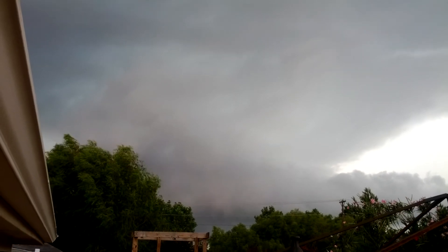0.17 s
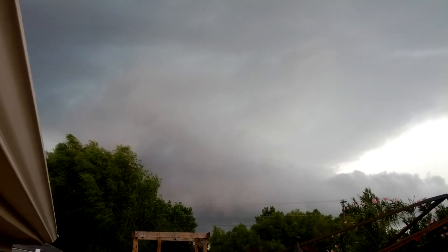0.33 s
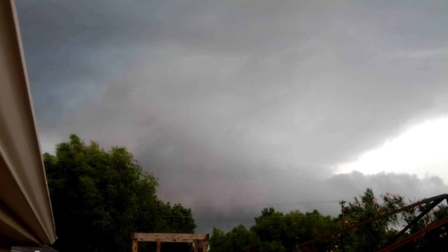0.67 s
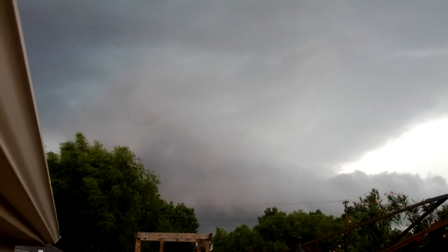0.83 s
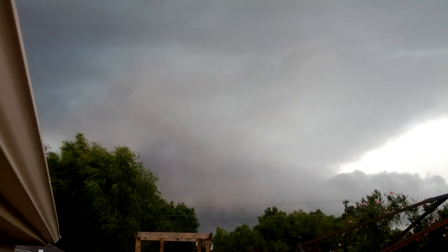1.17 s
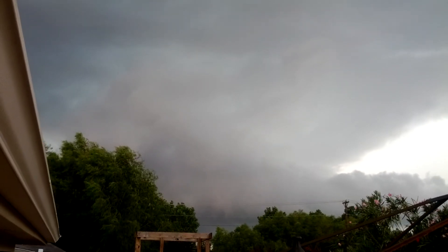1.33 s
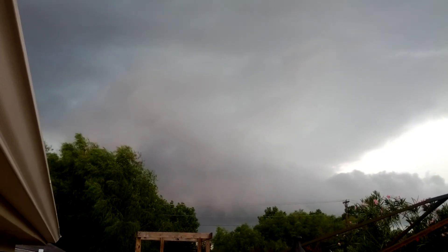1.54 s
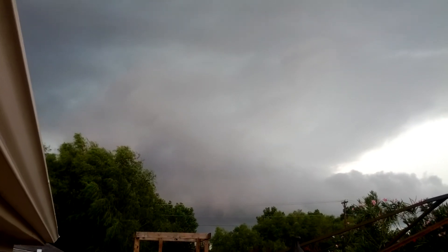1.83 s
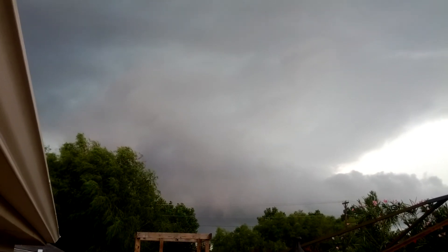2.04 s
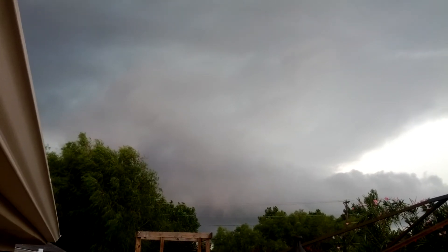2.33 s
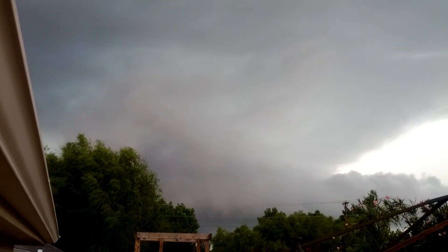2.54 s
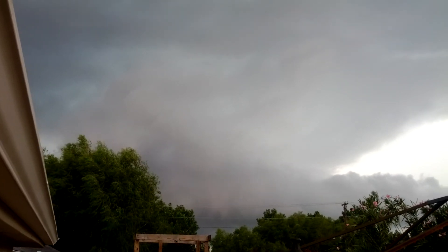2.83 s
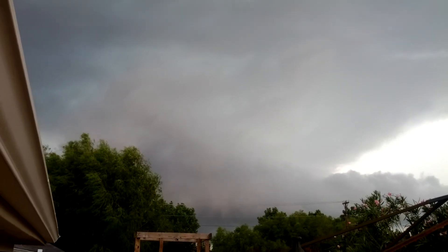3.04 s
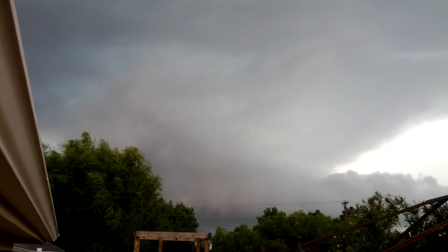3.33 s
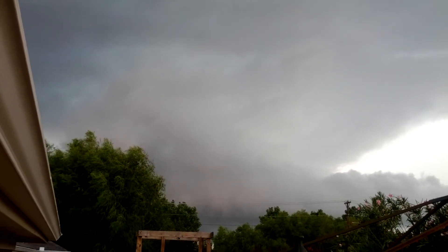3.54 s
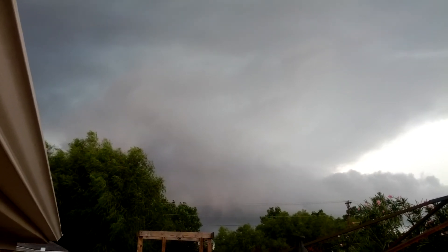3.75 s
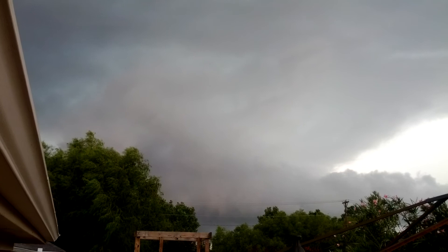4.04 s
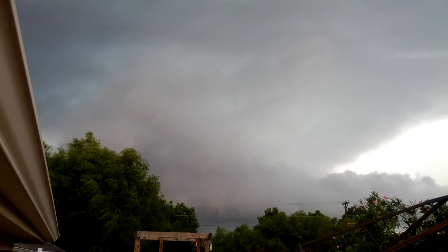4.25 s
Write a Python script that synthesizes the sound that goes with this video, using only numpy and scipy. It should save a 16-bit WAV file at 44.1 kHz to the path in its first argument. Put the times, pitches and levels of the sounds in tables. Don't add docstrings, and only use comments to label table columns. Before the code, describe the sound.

Low thunder mutters behind rain and small metal clinks, swells to a deep distorted roar midway, then rolls away, leaving rain hiss.

```python
import sys
import numpy as np
from scipy import signal
from scipy.fft import rfft, irfft, next_fast_len
from scipy.io import wavfile
from scipy.ndimage import uniform_filter1d, map_coordinates

SR = 44100
rng = np.random.default_rng(int(sys.argv[2]) if len(sys.argv) > 2 else 0)


def to_wav(sig):
    pcm = np.clip(np.atleast_2d(sig), -1, 1) * 32767
    pcm = np.round(pcm).astype(np.int16)
    wavfile.write(sys.argv[1], SR, pcm.T)


def how_loud(loudness_db):
    steps = np.asarray(loudness_db, float) / 20
    return 10 ** steps


N = 193907

# time in s, peak level in dB, pitch in Hz.
GRUMBLES = [(0.193, -29, 252), (.294, -15.5, 219), (.507, -19, 213), (0.544, -25, 255), (.653, -25, 363),
            (0.686, -45, 198), (.855, -18, 276), (0.859, -23, 106), (.978, -30, 225), (1.146, -28, 440),
            (1.273, -22.5, 248), (1.298, -23, 252), (1.402, -21.5, 423), (1.454, -21, 248),
            (1.488, -13, 347), (1.515, -13.5, 343), (1.563, -19, 324), (1.591, -17.5, 176),
            (1.62, -17.5, 320), (1.68, -18.5, 350), (1.761, -17, 225), (1.763, -21, 89), (1.786, -19, 280),
            (1.834, -24, 447), (1.891, -27, 398), (1.935, -30, 401), (2.003, -24, 436), (2.063, -22, 445),
            (2.106, -20.5, 386), (2.183, -12, 225)]
# time in s, peak level in dB, pitch in Hz.
BOOMS = [(2.194, -20, 377), (2.273, -12, 353), (2.331, -5, 360), (2.381, -8.5, 314), (2.412, 1.5, 244),
         (2.445, -3, 250), (2.504, -18, 240), (2.565, 2.5, 230), (2.619, 0, 241), (2.651, 3.5, 71),
         (2.708, 8, 187), (2.764, -1, 230), (2.831, -23, 246), (2.879, -1, 160), (2.913, 3.5, 208),
         (2.998, -1, 178), (3.101, -6.5, 174), (3.174, 5, 194), (3.229, -3, 200), (3.286, -1.5, 146),
         (3.359, -12.5, 203), (3.456, -4, 145), (3.491, -15.5, 342), (3.506, -12, 128), (3.633, -15, 127),
         (3.58, -23, 145), (3.737, -19, 143), (3.76, -27, 140), (3.909, -31, 125), (4.237, -22.5, 125)]
# time in s, peak level in dB, pitch in Hz.
HEAVES = [(0.039, -27, 74), (0.301, -31, 67.4), (0.509, -23, 75), (1.181, -25, 60), (1.618, -26, 95),
          (1.711, -28, 60), (2.27, -21, 59.4), (2.368, -15, 86), (2.425, -2.5, 49), (2.481, -8, 66.5),
          (2.52, -8, 48.3), (2.565, 2.5, 59), (2.603, 0.5, 88), (2.773, -2.5, 85), (2.928, -1.5, 66),
          (2.976, -2, 63.6), (3.035, -9, 61), (3.095, -32, 73), (3.171, -5, 52), (3.231, -7.5, 49.7),
          (3.298, -14, 54), (3.639, -22, 60), (3.79, -27, 76)]


def unit(x):
    return x / np.sqrt(np.mean(x ** 2) + 1e-20)


def curves(rows):
    s, *cols = np.transpose(rows)
    return [np.interp(np.arange(N) / SR, s, c) for c in cols]


def coloured(x, points):
    m = next_fast_len(N + 8192)
    f, v = np.transpose(points)
    log_hz = np.log(np.fft.rfftfreq(m, 1 / SR) + 1)
    gain = how_loud(np.interp(log_hz, np.log(f), v, left=-120, right=-120))
    return unit(irfft(rfft(x, m) * gain, m)[:N])


def patchy(depth_db, bins, frames):
    z = signal.stft(rng.standard_normal(N + 512), nperseg=512)[2]
    field = uniform_filter1d(rng.standard_normal(z.shape), bins, 0)
    field = uniform_filter1d(field, frames, 1)
    return signal.istft(z * how_loud(depth_db * unit(field)), nperseg=512)[1][:N]


def impulses(rate, spread_db):
    hit = rng.random(N) < rate / SR
    size = how_loud(spread_db * np.minimum(rng.exponential(1, N), 3.5))
    return unit(hit * rng.standard_normal(N) * size)


def wobble(rate):
    knots = rng.standard_normal(int(N * rate / SR) + 4)
    return map_coordinates(knots, [np.arange(N) * rate / SR])


def add(track, s, sound):
    part = track[max(round(s * SR), 0):][:len(sound)]
    part += sound[:len(part)]


def drone():
    # frequency in Hz, density in dB per Hz.
    drone_spectrum = [(15, -33), (25, 6.5), (112, -3.5), (240, -6.5), (592, -14), (1060, -8), (1350, -15),
                      (1750, -16), (3000, -26.5), (3900, -78), (6600, -120)]
    return how_loud(-41.5) * coloured(patchy(1.44, bins=3, frames=10), drone_spectrum)


def rain():
    # frequency in Hz, density in dB per Hz.
    rain_spectrum = [(1500, -7), (2000, -13), (2600, -19.5), (3250, -14.5), (3450, -9.5), (4100, -7.5),
                     (4800, -1.5), (5600, -1.5), (6500, -2.5), (7300, -8.5), (7700, -11.5), (10300, -17),
                     (12000, -23), (15700, -28)]
    start_db, easing_db_per_s = -40, 0.29
    level_db = start_db - easing_db_per_s * np.arange(N) / SR + .3 * wobble(3)
    drops = patchy(1.0, bins=5, frames=12) + 0.27 * impulses(rate=3000, spread_db=3.5)
    return how_loud(level_db) * coloured(drops, rain_spectrum)


def heavy_drops():
    # time in s, peak level in dB, pitch in Hz.
    drop_hits = [
        (0.379, -21, 5190),
        (1.4294, -35, 5770),
        (2.357, -19, 4870),
        (3.0194, -24, 5170),
        (3.5463, -31, 5600),
    ]
    out = np.zeros(N)
    t = np.arange(400) / SR
    for s, db, hz in drop_hits:
        add(out, s, how_loud(db - 7.5 - 60 * t / .006) * np.sin(2 * np.pi * hz * t))
    return out


def gusts():
    # time of the peak in s, peak level in dB, length in s.
    gust_swells = [(0.097, -51.5, 0.062), (0.26, -55, 0.059), (0.364, -53, 0.042), (0.46, -63, 0.027),
                   (0.559, -58, 0.051), (0.807, -54, 0.081), (0.937, -57, 0.057), (1.08, -52.1, 0.088),
                   (1.326, -52.4, 0.076), (1.51, -52, 0.034), (1.6, -54.0, 0.072), (1.753, -52.4, 0.078),
                   (1.864, -51, 0.076), (2.027, -53.1, 0.11), (2.24, -53, 0.088), (2.398, -54.4, 0.071),
                   (2.491, -54, 0.08), (2.63, -54, 0.12), (2.75, -55, 0.081), (2.91, -50.5, 0.061),
                   (3.04, -50, 0.081), (3.228, -53, 0.19), (3.43, -52.5, 0.062), (3.555, -51.5, 0.074),
                   (3.787, -57, 0.1), (3.976, -58, 0.091), (4.193, -72, 0.048), (4.337, -58, 0.047)]
    lull_db, rise_over_fall = -58.5, 0.68
    t = np.arange(N) / SR
    swell = how_loud(lull_db)
    for s, db, length in gust_swells:
        side = np.where(t < s, .6 * rise_over_fall, .6)
        swell = swell + how_loud(db) * np.exp(-((t - s) / length / side) ** 2)
    return swell


def swish():
    # frequency in Hz, density in dB per Hz.
    swish_spectrum = [(4410, -58), (7500, 1), (8930, 2.5), (10600, 2.5), (12100, -3), (12500, -1),
                      (14400, -8), (15600, -6)]
    flutter = patchy(1.5, bins=8, frames=6) + .4 * impulses(rate=3000, spread_db=1.2)
    return how_loud(3.0) * gusts() * coloured(flutter, swish_spectrum)


def insect():
    # time in s, level in dB.
    insect_level = [
        (0, -66),
        (.3, -63),
        (2.5, -63),
        (3.5, -63),
        (3.8, -61.5),
        (4.4, -60.5),
    ]
    stroke_rate, first_stroke = 58.16, .0139
    starts = np.arange(first_stroke, N / SR, 1 / stroke_rate)
    starts += .00002 * np.abs(np.cumsum(rng.standard_normal(len(starts))))
    sizes = how_loud(1.2 * rng.standard_normal(len(starts)))
    strokes = np.bincount((starts * SR).astype(int), sizes, N)[:N]
    t = np.arange(700) / SR
    onset = 1 - np.exp(-t / 0.00061)
    shape = onset * (how_loud(-60 * t / .012) + 0.13 * how_loud(-60 * t / 0.027))
    ring = signal.fftconvolve(strokes, shape * np.sin(2 * np.pi * 12790 * t))[:N]
    return how_loud(curves(insect_level)[0] + .4) * unit(ring)


def metal_clinks():
    # frequency in Hz, time to fall 60 dB in s, level in dB.
    metal_modes = [(9430, .055, 0), (11000, .055, 4), (13350, .05, 3), (14950, .055, 5), (15300, .05, 4)]
    # time in s, first mode's peak in dB, upper modes against it in dB, lean to the third in dB.
    clink_hits = [(.2483, -44, -9, .1), (1.7365, -42, -10, -2), (1.7614, -46, -7, -2),
                  (1.8417, -33, -15, -2), (2.2254, -41, -20, -1), (2.245, -28.5, -21, -1),
                  (2.464, -34, -17, -5), (2.497, -46, -8, 5), (2.586, -35, -12, 3), (2.6813, -43, -10, 2),
                  (2.7467, -38, -13, 3), (2.7721, -38, -16, 1), (3.0624, -32, -10, -8),
                  (3.2204, -41, -6, 3), (3.2314, -41, -1, 11), (3.3722, -34, -19, -2),
                  (3.8716, -42, -14, -1), (4.0492, -44, -2, -4), (4.3196, -44, -5, -1)]
    upper_fall_db = (-1, -4, -6, -7.5)
    bounce = (.0125, -16, 7)
    out = np.zeros(N)
    t = np.arange(SR // 8) / SR
    onset = 1 - np.exp(-t / 0.00092)
    for s, db, upper_db, lean_db in clink_hits:
        for late, loss_db, bright_db in ((0, 0, 0), bounce):
            upper = upper_db + bright_db + np.add(upper_fall_db, [0, lean_db, 0, 0])
            ring = np.zeros(len(t))
            for (hz, t60, mode_db), level in zip(metal_modes, np.r_[0, upper]):
                decay = how_loud(db + loss_db + level + mode_db - 60 * t / t60)
                ring += decay * np.sin(2 * np.pi * (hz * t + rng.random()))
            add(out, s + late, ring * onset)
    return out


def evened(x, share):
    swell = np.abs(signal.hilbert(x, next_fast_len(N))[:N])
    return unit(x / (swell + 0.22) ** share)


def wake(part_hz, strength_db):
    wake_s = (0.0067, 0.024)
    octaves = 0.71
    now = np.arange(0, N, 32) / SR
    stir = np.zeros(len(now))
    for s, db, hz in GRUMBLES + BOOMS + HEAVES:
        time_off = (now - s) / np.where(now < s, *wake_s)
        pitch_off = np.log2(hz / part_hz) / octaves
        stir += how_loud(db) * np.exp(-time_off ** 2 - pitch_off ** 2)
    return np.interp(np.arange(N) / SR, now, stir) / how_loud(strength_db)


def rolling():
    # time in s, strength in dB, dullness in dB from a longer path through air and cloud.
    peal = [(0, -44, -1), (.7, -40, -3.5), (.9, -38, -3.5), (1.2, -40.5, -6.5), (1.5, -32, -1),
            (1.75, -34, -6.5), (2.0, -38, -8), (2.22, -34, -3), (2.4, -15, 3.5), (2.53, -12.5, 1.5),
            (2.63, -5, -4.5), (2.75, -10.5, -1.5), (2.95, -15.5, -3.5), (3.1, -22.5, -2), (3.25, -20, 9),
            (3.55, -31.5, 8.5), (3.95, -41, 4), (4.4, -42, 6)]
    # frequency in Hz, density in dB per Hz.
    deep = [(12, -40), (30, -20), (46, -13), (56, -9), (65, 0), (76, -5), (90, -4), (130, -40)]
    low = [(60, -49), (90, -6), (140, -1.5), (200, -12.5), (290, -19.5)]
    middle = [(140, -21), (200, 3), (270, 2), (480, -5), (700, -18.5)]
    crackle = [(350, -6), (500, -3.5), (700, -1.5), (1200, -10), (2000, -23.5), (3500, -42.5), (5000, -60)]
    # offset in dB, growth with strength, share of dullness.
    follow = [(-3.5, 1.086, 0.019), (-3, 0.87, 0.42), (-2, 0.95, -0.19), (-11, 0.74, -0.74)]
    heave_depth_db = (0.76, 1.57, 1.86, 1.66)
    wake_share = (0.18, .1, 0.088, 0.034)
    centre_hz = (68, 140, 268, 410)
    sharpness = (0.36, 0.58, 0.55, 0.41)
    evenness = (1.0, 0.9, 0.33, 0.082)
    pivot_db, heave_rate = -20, 14

    shocks = impulses(rate=260, spread_db=2.0)
    strength_db, dull_db = curves(peal)
    out = np.zeros(N)
    for i, spectrum in enumerate((deep, low, middle, crackle)):
        offset_db, grows, dull_share = follow[i]
        level_db = pivot_db + offset_db + grows * (strength_db - pivot_db) + dull_share * dull_db
        level_db = level_db + heave_depth_db[i] * wobble(heave_rate)
        trail = 1 + wake_share[i] * wake(centre_hz[i], strength_db)
        blurred = coloured(sharpness[i] * shocks + rng.standard_normal(N), spectrum)
        out += trail * how_loud(level_db) * evened(blurred, evenness[i])
    return out


def cracks():
    # time in s, level in dB, decay in s.
    flares = [(.294, -40, 0.033), (.509, -37.5, 0.016), (0.858, -35, 0.025), (.93, -36, 0.017),
              (1.149, -41.5, 0.089), (1.3, -45, 0.044), (1.49, -38, 0.055), (1.6, -35.5, 0.11),
              (1.7, -41, 0.14), (1.83, -37.5, .03), (2.186, -38, 0.018), (2.41, -37, 0.013),
              (2.57, -23, 0.03), (2.604, -22, 0.02), (2.649, -20.5, 0.024), (2.71, -21, 0.048),
              (2.76, -25, 0.02), (2.82, -32.5, .05), (2.915, -30, 0.046), (2.98, -31.5, 0.039),
              (3.05, -35, 0.036), (3.168, -34, 0.023), (3.55, -50, 0.016)]
    # frequency in Hz, density in dB per Hz.
    front_spectrum = [(300, -27), (500, 11), (900, 10.5), (1500, 3.5), (2300, -12), (3400, -15),
                      (5000, -33)]
    flare = np.zeros(N)
    t = np.arange(-.06, .15, 1 / SR)
    for s, db, fall in flares:
        width = np.where(t < 0, .4 * fall, fall)
        add(flare, s - .06, how_loud(db) * np.exp(-(t / width) ** 2))
    return flare * coloured(rng.standard_normal(N), front_spectrum)


def booms():
    out = np.zeros(N)
    for s, db, hz in GRUMBLES + BOOMS + HEAVES:
        cycles = np.arange(-2.5 * SR / hz, 4 * SR / hz) * hz / SR
        longer = 1.4 if hz < 150 else 1
        swell = np.exp(-(cycles / longer / np.where(cycles < 0, .8, 1.3)) ** 2)
        swing = np.sin(2 * np.pi * (cycles + rng.random()))
        add(out, s - 2.588 / hz, how_loud(db - 3.0) / longer * swell * swing)
    return out


def thunder():
    return rolling() + cracks() + booms()


def scene():
    weather = drone() + rain() + heavy_drops() + swish()
    return (weather + insect() + metal_clinks() + thunder())[None]


def roll_off(x):
    return signal.sosfilt(signal.butter(12, 15710, fs=SR, output="sos"), x)


def record(dry):
    top, knee = .7, 24
    clipped = dry / (1 + np.abs(dry / top) ** knee) ** (1 / knee)
    coupled = signal.lfilter(*signal.butter(1, .6, "high", fs=SR), clipped)
    return roll_off(coupled)


dry = scene()
out = record(dry)
to_wav(out)
```